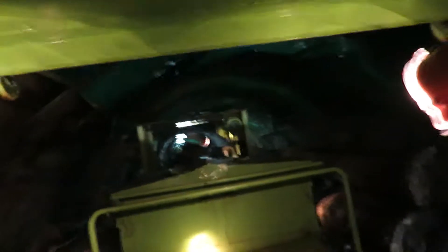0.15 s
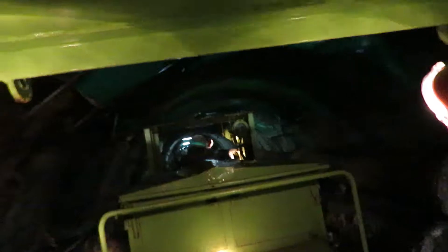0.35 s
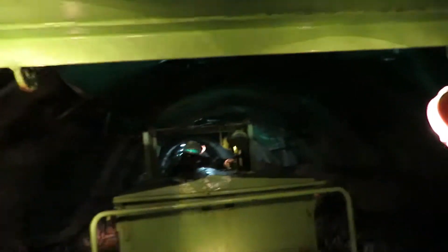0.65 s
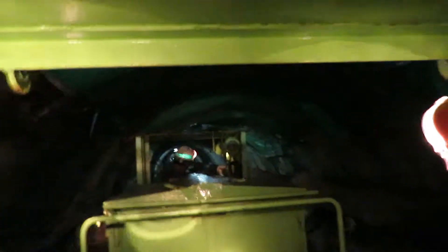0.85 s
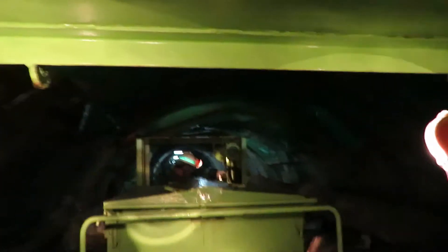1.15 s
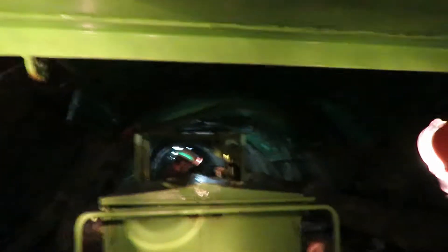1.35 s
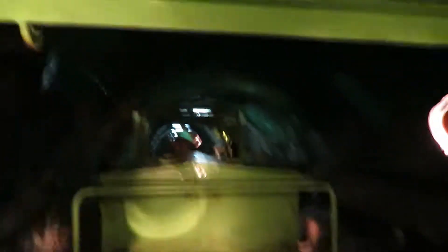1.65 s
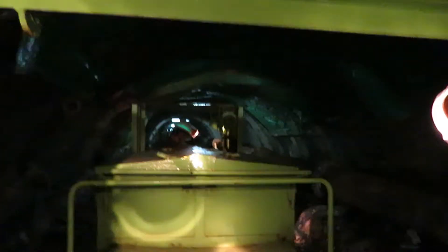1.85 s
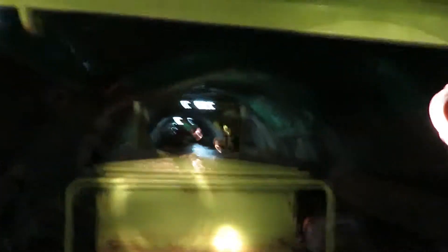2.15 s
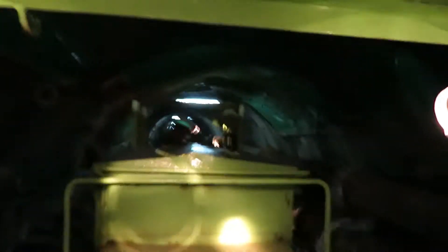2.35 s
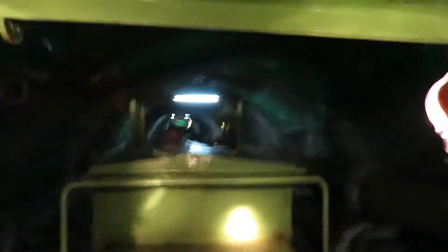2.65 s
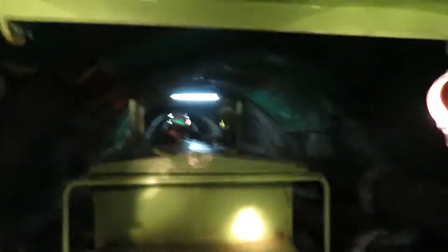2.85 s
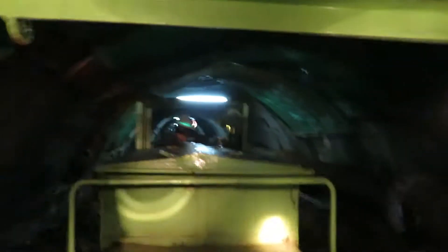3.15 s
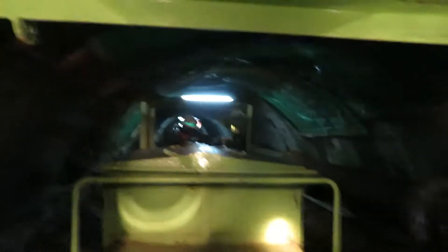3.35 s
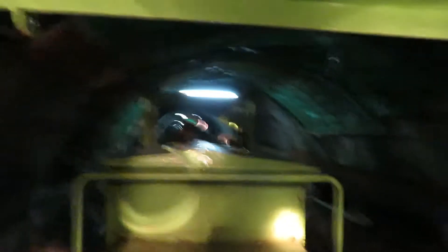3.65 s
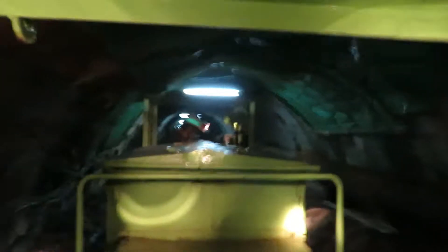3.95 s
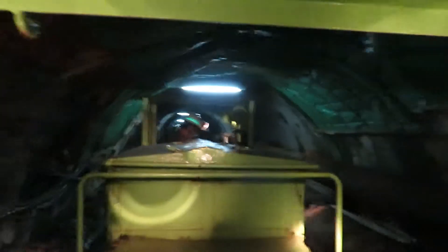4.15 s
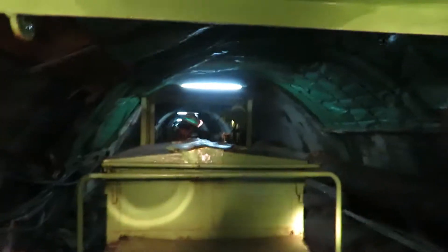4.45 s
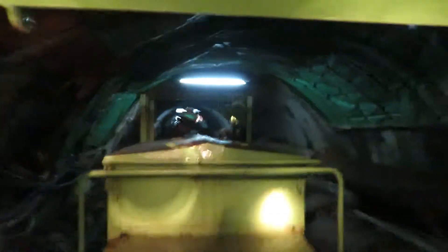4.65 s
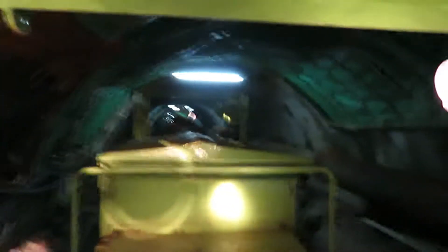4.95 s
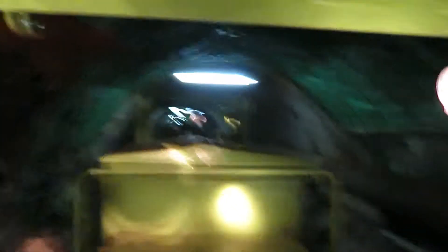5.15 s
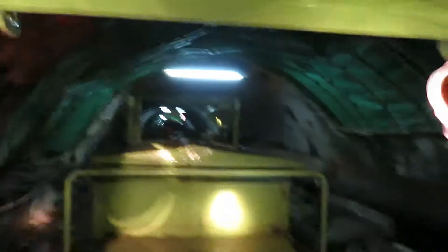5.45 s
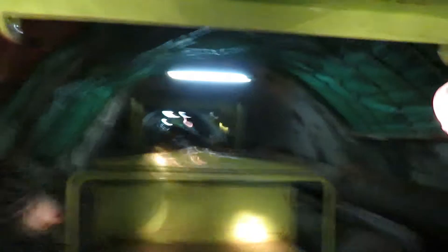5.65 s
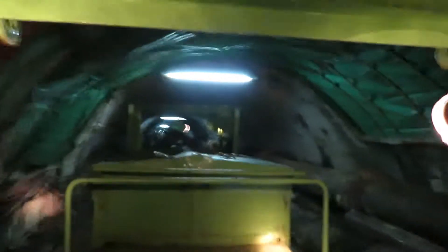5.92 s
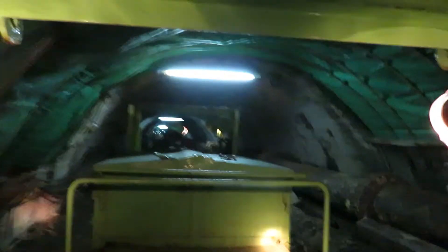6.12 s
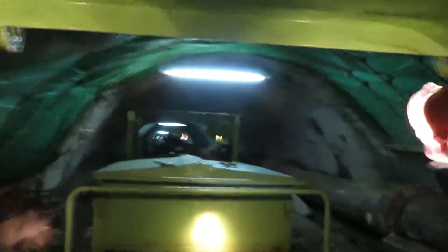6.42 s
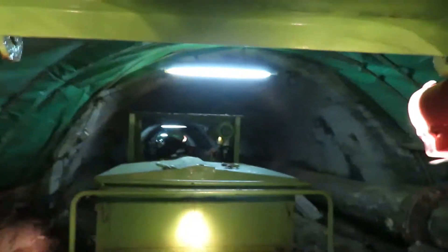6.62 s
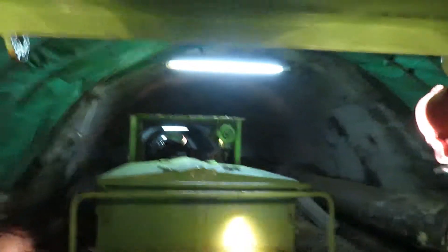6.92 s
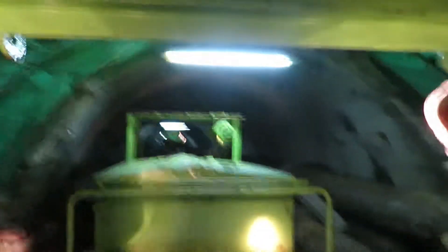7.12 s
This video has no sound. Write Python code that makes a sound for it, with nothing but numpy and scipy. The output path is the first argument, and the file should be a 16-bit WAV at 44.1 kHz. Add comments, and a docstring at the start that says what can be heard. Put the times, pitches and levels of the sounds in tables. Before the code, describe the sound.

A small electric mine train rolls through a tunnel, steel cars booming and roaring while loose bars, doors and couplings clack and clank irregularly.

```python
"""Mine train in a rock tunnel

A small electric train rolls along, heard from an open car behind the locomotive.
Steel car bodies boom and roar (resonant noise), the drive hums (wavering sines), loose fittings chatter.
Couplings, bars and doors clack as the cars jolt (decaying modes and noise); the tunnel answers briefly."""
import sys
import numpy as np
from scipy import signal
from scipy.fft import rfft, irfft, next_fast_len
from scipy.io import wavfile
from scipy.ndimage import uniform_filter1d, map_coordinates

SR = 44100
rng = np.random.default_rng(int(sys.argv[2]) if len(sys.argv) > 2 else 0)


def file_out(sig):
    """Save sig as 16-bit WAV at sys.argv[1]."""
    # one column per channel
    cols = np.atleast_2d(sig).T
    # limit, then scale
    lim = np.clip(cols, -1, 1)
    pcm = np.round(lim * 32767).astype(np.int16)
    wavfile.write(sys.argv[1], SR, pcm)


N = 321048  # samples, 7.28 s

# tunnel tail decay: freq_hz, t60_s
TUNNEL_DECAY = [(300, 0.62), (2500, 0.15), (6000, 0.15), (12000, 0.073)]
# stereo width: freq_hz, side_gain_db
SIDE_WIDTH = [(30, -40), (85, -39.5), (170, -25), (350, -21), (700, -20), (1400, -14.5), (2800, -10),
              (5600, -4.5), (11000, 4)]
# stereo tilt: freq_hz, left_minus_right_db
LEFT_LEAN = [(200, 0), (600, 0.1), (1000, 1.5), (2000, 0.3)]
TOP_HZ = 14500

# motor hum swells: middle_s, length_s, level_db
HUM_SWELLS = [(0.348, 0.8, -19.5), (1.5, 0.15, -23.5), (2.558, 0.23, -23.5), (2.995, 0.57, -29),
              (4.33, 0.26, -19), (6.533, 0.25, -21), (7.11, 0.065, -14)]
HUM_HZ, HUM_DB, HUM_SWING_DB = 170.6, -31, 1.5  # level between the swells
WHINE_HZ, WHINE_DB, WHINE_SWING_DB = 1820, -31.5, 4.5  # gears; level relative to the rolling

# car body notes: middle_s, length_s, pitch_hz, level_db
DRONES = [(1.026, 0.12, 283, -20.5), (1.305, 0.11, 82.46, -17.5), (1.583, 0.095, 69.1, -18),
          (2.268, 0.13, 256, -17.5), (4.56, .14, 139, -21), (5.302, .2, 137.4, -19),
          (4.956, 1, 139.2, -23.5), (5.001, .3, 86, -19), (5.15, 0.35, 285.4, -28),
          (5.997, 0.22, 285.2, -26.5), (6.305, 0.28, 140.8, -25), (6.88, 0.09, 67.6, -19.5),
          (7.098, 0.29, 138.6, -22), (7.214, 0.11, 284, -22)]
DRONE_WAVER_HZ, DRONE_SWING_DB = 2.45, 2

# small loose parts; level relative to the grinding, before the contact spectrum
TICK_HZ, TICK_LOG_SPREAD, TICK_T60_S = 2604, 0.45, 0.045
TICK_DB, TICK_SCATTER_DB = -15.5, 6.5

# sliding bolt partials: freq_hz, level_db, t60_s
BOLT_MODES = [(2600, -9, .15), (3025, -10, .17), (3408, -6, .11), (4140, -2, .078), (4764, -10, .12),
              (6218, 0, .08), (7135, -7, .1), (7450, -9, .06), (8732, -13, .09), (12400, -17, .045)]
# safety bar partials: freq_hz, level_db, t60_s
BAR_MODES = [(1276, -1, .15), (1750, 1, .06), (2358, -9, .25), (3456, -3, .1), (3660, -4, .06),
             (3811, -2, .14), (4600, -8, .08), (5098, -8, .06), (5803, -12, .12), (8100, -16, .08)]
# jolts ringing both: start_s, bolt_db, bar_db
BOLT_BAR_RINGS = [(0.538, -23.5, -32), (2.618, -32, -35), (2.837, -37, -38), (3.26, -37, -34),
                  (5.280, -31, -23), (5.316, -33, -34), (5.364, -36, -42), (6.123, -42, -23)]

# thuds of car walls and of wheels dropping over rail joints (98-140 Hz): start_s, level_db, centre_hz
THUDS = [(0.18, -28, 456), (0.44, -16, 237), (0.538, -22, 627), (0.544, -15, 248), (0.92, -22.5, 439),
         (0.969, -17.5, 128.5), (2.05, -13.5, 118.6), (2.618, -22.5, 710), (2.66, -22.5, 378),
         (2.832, -21, 650), (2.88, -26, 733), (3.075, -15, 140), (3.565, -39, 650), (4.14, -22.5, 470),
         (4.91, -23.5, 480), (4.999, -20, 98), (5.275, -19, 487), (5.32, -26.5, 542), (5.876, -31, 520),
         (6.122, -26, 575), (7.05, -14.5, 100.5)]
THUD_EDGE_RATIO, THUD_RISE_S, THUD_T60_S = 0.94, 0.0014, 0.12  # upper band edge over centre

# knocks of bars and doors: hit_s, level_db, dull_clank_db, bright_edge_db (both relative), note_hz
CLACKS = [(0.03, -24, -5.5, -31.5, 1890), (0.07, -33, -5, -15, 2200), (0.115, -31, -12, -19.5, 2380),
          (0.188, -28, -5.5, -27, 2190), (0.305, -28, -3, -32.5, 1760), (0.418, -19, -9.5, -29, 2230),
          (0.54, -17, -7.5, -13.5, 1081), (0.76, -25.5, 8, -20.5, 1020), (0.8707, -28.5, 8, -19, 1230),
          (0.9385, -20.5, -11, -40, 2100), (0.98, -37, 16.5, -32, 1910), (1.072, -35.5, 16, -28.5, 1274),
          (1.1628, -29.5, 7, -36.5, 1223), (1.268, -28, -7, -27.5, 1780), (1.3573, -22, -13, -41, 900),
          (1.4032, -28, 2, -31.5, 1215), (1.6282, -29.5, 13, -28.5, 1760), (1.7789, -29, 7, -39, 1920),
          (1.933, -27.5, -3, -27, 1500), (2.015, -32, -8, -23.5, 2500), (2.066, -35, 7, -16.5, 1010),
          (2.0847, -32, 5, -23.5, 1005), (2.147, -28.5, 7, -25.5, 1010), (2.247, -30.5, 12, -21.5, 1034),
          (2.2797, -32.5, 16, -27.5, 1146), (2.355, -25, -1, -31, 2740), (2.4249, -33.5, 5, -27, 1670),
          (2.505, -29, 9, -16, 1026), (2.5907, -22, 10, -16.5, 1050), (2.559, -28.5, 1, -27, 2020),
          (2.6135, -15.5, -4, -17.5, 1310), (2.633, -23, 6, -26, 2210), (2.6638, -29.5, 16, -25.5, 1242),
          (2.7197, -29.5, 13, -30, 1090), (2.7871, -30.5, 13, -21.5, 1030), (2.8117, -19.5, 8.5, -15, 1031),
          (2.8364, -21.5, 3.5, -12.5, 1050), (2.856, -29, -4, -21, 1530), (2.889, -30, -1, -24.5, 2110),
          (3.016, -23.5, -10, -22, 1620), (3.03, -26.5, -6, -24, 1626), (3.0494, -23.5, 12, -18.5, 1034),
          (3.1797, -33.5, 17.5, -35, 1094), (3.256, -21, 1.5, -17.5, 1220), (3.3362, -23, 1, -33, 1046),
          (3.399, -29, -6, -26.5, 2360), (3.5535, -26, 10, -24, 1140), (3.589, -28, -7, -28.5, 2020),
          (3.6602, -20.5, -13, -32.5, 1700), (3.742, -28, 0, -32, 2775), (3.897, -31.5, -1, -26.5, 2350),
          (4.0417, -28.5, 7, -29.5, 1164), (4.061, -28.5, 1, -29, 2290), (4.13, -23, -8, -30, 1800),
          (4.2284, -22, -10, -31, 2040), (4.322, -27.5, -1, -36, 3300), (4.4223, -32.5, 15, -28.5, 1357),
          (4.5035, -22.5, -7, -36, 3210), (4.6109, -25.5, -1.5, -36, 1240), (4.655, -26, -3, -29, 3300),
          (4.7336, -26, 4, -23, 986), (4.7855, -20.5, -8.5, -31, 2075), (4.8332, -21.5, -14, -31.5, 3380),
          (4.9312, -27.5, 4.5, -28.5, 1033), (5.003, -24, -4, -40.5, 3010),
          (5.2593, -21.5, 13, -12.5, 1040), (5.281, -17, -1, -11.5, 1295), (5.295, -21.5, 14, -17, 1043),
          (5.3153, -18, -12, -12, 1610), (5.326, -19.5, -6, -19.5, 2290), (5.339, -22.5, 4.5, -23.5, 2270),
          (5.3629, -21, -1.5, -15.5, 1590), (5.384, -26, 5.5, -23.5, 1970), (5.645, -33.5, -8, -25, 2130),
          (5.806, -35, 10, -31.5, 1420), (5.9531, -26, -2.5, -31.5, 1020), (6.0701, -28, 8, -22.5, 960),
          (6.1216, -17, -5, -17, 1630), (6.21, -29, -11, -21.5, 1550), (6.2936, -22, -4.5, -34, 1805),
          (6.4403, -30, 13.5, -33.5, 1800), (6.4737, -26, 5.5, -20.5, 1063), (6.522, -21.5, 0, -29.5, 1000),
          (6.5984, -22.5, -0.5, -23, 1287), (6.6351, -22, 1.5, -17, 1040),
          (6.786, -28.5, 10.5, -16.5, 1095), (6.835, -27, 4, -18.5, 1010), (7.0823, -38, 20.5, -35, 1020),
          (7.1656, -26.5, 7, -33.5, 1090)]
# steel fitting modes: freq_hz, level_db, t60_s
STEEL_MODES = [(991, -5.5, 0.39), (1070, -3, 0.17), (1278, -5.5, 0.28), (1600, -25.5, 0.26),
               (1587, -6, 0.082), (1970, -14.5, 0.14), (2250, -13.5, 0.28), (2870, -19, 0.17),
               (2680, -17.5, 0.074), (3850, -11, 0.066), (4680, -10, 0.18), (4990, -4.5, 0.19),
               (5700, -4, 0.14), (6140, -8, 0.11), (6720, -7, 0.12), (7100, -3.5, 0.13), (8080, -8, 0.1),
               (8700, -2, 0.13), (10600, -1, 0.1), (12600, 1, .08)]
# spectrum of a steel contact: freq_hz, gain_db
CONTACT_SPECTRUM = [(300, -9), (550, 2.5), (750, 1), (1050, 10.5), (2000, 8), (2800, 4.5), (3800, -1),
                    (5400, -10), (6300, -12), (7200, -14), (7800, -17), (8700, -18), (10500, -21),
                    (13000, -23.5), (15000, -32.5)]
# decay of contact noise: freq_hz, t60_s
CONTACT_DECAY = [(500, 0.39), (2000, 0.19), (5000, 0.14), (12000, 0.11)]
GRIT_DB, GRIT_KNOTS_PER_S = 1.5, 220  # a struck part judders against its seat: ragged knocks

# couplings taking up slack: hit_s, level_db, link_ring_db, pin_ring_db
CLANKS = [(0.7597, -11.5, -31, -32), (1.6821, -13.5, -41, -48), (1.8603, -14, -46, -39.5),
          (2.146, -12, -29.5, -44), (2.623, -20, -46, -34.5), (2.842, -16, -44, -37),
          (3.5529, -21, -44, -47), (4.873, -15.5, -35, -44), (5.3296, -15, -38, -28),
          (6.1449, -14.5, -42, -50), (6.8347, -7.5, -24, -31.5)]
# coupling modes: freq_hz, level_db, t60_s
COUPLING_MODES = [(792, 6, 0.2), (1034, 6.5, 0.12), (1230, -7, 0.12), (1479, -4, 0.11), (1900, -6.5, 0.14),
                  (2320, -11.5, 0.24), (2840, -6, 0.12), (3060, -5.5, 0.2), (4000, -12, 0.11),
                  (4650, -4.5, 0.18)]
# long notes of link, then pin: freq_hz, t60_s
LINK_AND_PIN = [(1560, 0.4), (2705, 0.42)]
RING_ROUGHNESS, RING_KNOTS_PER_S = 0.39, 45.6  # loose parts chatter against each other as they ring

# flange pressure on the rail: time_s, relative_grind_db
FLANGES = [(0, -35.5), (.26, -39), (.51, -33), (.72, -37), (.97, -35.5), (1.13, -41.5), (1.42, -37),
           (1.59, -39), (1.8, -34.5), (2.07, -34.5), (2.3, -32.5), (2.7, -32.5), (3.08, -33), (3.5, -38),
           (3.65, -32.5), (3.95, -41.5), (4.11, -38), (4.46, -39), (4.9, -31), (5.2, -34.5), (5.4, -38.5),
           (5.6, -39.5), (5.72, -45.5), (5.85, -39), (6.12, -33.5), (6.4, -38.5), (6.55, -30),
           (6.75, -38.5), (7, -35), (7.28, -31.5)]
# spectrum of grinding: freq_hz, gain_db
RAIL_SPECTRUM = [(600, -0.5), (800, 8.5), (1030, 4), (1350, 0), (1850, 0), (2500, -10), (3400, -12.5),
                 (4500, -21.5), (6000, -27), (7100, -33.5), (7800, -34.5), (10000, -41), (14000, -42.5)]
GRIND_REF_DB, SCRAPE_REF_DB, SCRAPE_DB_PER_DB = -34.5, -46, 0.62  # scraping at the reference; its growth
# rough spots on the rail: middle_s, length_s, roar_change_db, grind_change_db, scrape_change_db
ROUGH_SPOTS = [(0.101, 0.12, -5.5, -3.5, 5.5), (1.441, 0.16, 2.5, 6.5, 3.5), (2.274, 0.076, 5.5, 2.5, 8),
               (3.088, 0.054, 3, -5, 2.5), (4.104, 0.26, 3.5, 6.5, 3.5)]

# rolling on uneven track: time_s, relative_roar_db
ROLLING = [(0, -19.5), (.5, -22), (1.7, -20), (1.9, -22.5), (2.65, -20.5), (3.4, -23), (4.45, -23.5),
           (4.85, -19.5), (5.35, -20.5), (5.47, -26), (5.75, -27.5), (5.9, -22), (6.3, -24.5),
           (6.55, -19.5), (6.95, -23), (7.28, -19)]
# car body boom: time_s, relative_level_db
BOOM = [(0, -17), (.4, -20), (.8, -17.5), (1.05, -17), (1.4, -18.5), (1.75, -17), (1.98, -19.5),
        (2.15, -22.5), (2.45, -22), (2.85, -17.5), (3.15, -20), (3.26, -22), (3.4, -18), (3.6, -19),
        (3.95, -18.5), (4.28, -19), (4.47, -23), (4.58, -17), (5.15, -20.5), (5.33, -18), (5.48, -24),
        (5.78, -23.5), (5.9, -20.5), (6.1, -23), (6.55, -18.5), (6.95, -20), (7.1, -18.5), (7.28, -22)]
# chassis swells: time_s, level_db
SHUDDER = [(0, -26.5), (.6, -26), (1.15, -28.5), (1.45, -32.5), (1.7, -26), (2.08, -21), (2.35, -28.5),
           (3.05, -24), (3.45, -34), (3.75, -19), (4.35, -37), (4.95, -24.5), (5.6, -40), (5.9, -24),
           (6.5, -29), (7.28, -30)]
# floor boom as the car rocks: time_s, relative_level_db
FLOOR_BOOM = [(0, -19.5), (.35, -18.5), (.45, -23), (.6, -15.5), (.75, -30), (.92, -23), (1.03, -15.5),
              (1.15, -15.5), (1.3, -16.5), (1.43, -18), (1.58, -14), (1.7, -18.5), (1.9, -20), (2.05, -15),
              (2.25, -15.5), (2.45, -22.5), (2.68, -14.5), (2.82, -27), (3.12, -16), (3.27, -21.5),
              (3.43, -16), (3.68, -15.5), (3.85, -21.5), (4.12, -13.5), (4.42, -21.5), (4.7, -19),
              (5.03, -16.5), (5.3, -19), (5.5, -22.5), (5.8, -21.5), (6, -16), (6.2, -19.5), (6.35, -20.5),
              (6.48, -16), (6.7, -20), (6.88, -15.5), (6.98, -20), (7.06, -18), (7.28, -14.5)]
# chassis resonances: freq_hz, width_hz, level_db
CHASSIS_MODES = [(38.7, 3.8, 3.5), (49, 6.4, -2.5)]
# floor resonances: freq_hz, width_hz, level_db
FLOOR_MODES = [(67.8, 11, 2.3), (89.1, 14, 3.4)]
# body resonances: freq_hz, width_hz, level_db
BODY_MODES = [(117.3, 23, -2), (140.6, 29, -1), (171.8, 38, -3.5)]
# panel resonances: freq_hz, width_hz, level_db
PANEL_MODES = [(218, 93, -6.5), (254.3, 40, 0), (282.7, 33, 1.5), (349.7, 73, -3), (415.4, 67, -3.5),
               (491.7, 58, -1.5), (574, 121, -7.5), (745.6, 14, -9)]
# broad roar between the panel resonances: freq_hz, gain_db
ROLL_SPECTRUM = [(88, -30), (150, 4.5), (211, 0), (269, -4), (317, -8), (494, -26.5), (700, -16),
                 (1030, -24.5), (1200, -13.5), (1560, -54), (2640, -120)]
BOOM_SWING_DB, LUMP_DB, LUMP_KNOTS_PER_S = 1.26, 0.24, 11  # random surges of boom and of roar
TAP_SHARE = 0.26  # share of roar and grinding power that follows the taps


def amp(db):
    """Amplitude of a dB value."""
    return 10 ** (np.asarray(db) / 20)


def unit(x):
    """Scale to rms 1."""
    return x / np.sqrt(np.mean(x ** 2) + 1e-20)


def unit_attack(x):
    """Scale mid and side so that the first 20 ms of the mid have rms 1."""
    return x / np.sqrt(np.mean(x[..., :1, :SR // 50] ** 2, axis=-1, keepdims=True))


def along(points, hz):
    """Interpolate (freq_hz, value) points on a log frequency axis."""
    f, v = np.transpose(points)
    return np.interp(np.log(hz + 1), np.log(f + 1), v)


def curve(rows):
    """Interpolate (time_s, value) points to one value per sample."""
    s, values = np.transpose(rows)
    return np.interp(np.arange(N) / SR, s, values)


def wobble(knots_per_s, size=N):
    """Smooth random curve through normal-distributed knots."""
    knots = rng.standard_normal(int(size * knots_per_s / SR) + 4)
    return map_coordinates(knots, [np.arange(size) * knots_per_s / SR])


def sine(hz):
    """Sine following a frequency curve."""
    return np.sin(2 * np.pi * np.cumsum(hz) / SR)


def swell(middle_s, length_s):
    """Rounded hump of height 1."""
    return np.exp(-(2 * (np.arange(N) / SR - middle_s) / length_s) ** 4)


def filtered(x, response):
    """Multiply the spectrum by a response of frequency."""
    n = x.shape[-1]
    m = next_fast_len(n + 4096)
    return irfft(rfft(x, m) * response(np.fft.rfftfreq(m, 1 / SR)), m)[..., :n]


def band(hz, lo_hz, hi_hz, order=4):
    """Gain of a band-pass."""
    return 1 / np.sqrt((1 + (lo_hz / (hz + 1)) ** (2 * order)) * (1 + (hz / hi_hz) ** (2 * order)))


def resonances(modes, hz):
    """Power sum of steep resonances, each the square of a simple one."""
    power = sum(amp(2 * db) * np.abs(hz * w / (c * c - hz * hz + 1j * hz * w)) ** 4 for c, w, db in modes)
    return np.sqrt(power)


def rush(response, even_s):
    """Mid and side noise, levelled to rms 1 over spans of even_s."""
    x = filtered(rng.standard_normal((2, N)), response)
    power = np.abs(uniform_filter1d(x ** 2, max(int(even_s * SR), 64), axis=1))
    return x / np.sqrt(power + 1e-20)


def patchy(x, depth_db):
    """Random swells, each a few hundred Hz wide and some tens of ms long."""
    z = signal.stft(x, nperseg=512)[2]
    field = uniform_filter1d(rng.standard_normal(z.shape[1:]), size=4, axis=0)
    field = uniform_filter1d(field, size=8, axis=1)
    return unit(signal.istft(z * amp(depth_db * unit(field)), nperseg=512)[1][:, :N])


def dying(t60s, size):
    """Mid and side noise in which each frequency decays at its own rate."""
    hz, t, z = signal.stft(rng.standard_normal((2, size)), SR, nperseg=128)
    decay = amp(-60 * t / along(t60s, hz)[:, None])
    return signal.istft(z * decay, SR, nperseg=128)[1][:, :size]


def add(track, s, sound):
    """Mix a sound in at time s."""
    start = max(round(s * SR), 0)
    track[:, start:start + sound.shape[1]] += sound[:, :N - start]


def mode_sum(strength, hz, t60, t):
    """Decaying sines from complex mid and side strengths."""
    return np.imag(strength @ np.exp(np.outer(2j * np.pi * hz - np.log(1000) / t60, t)))


def struck(modes, t):
    """Partials ringing in random phase after a short contact."""
    hz, db, t60 = np.transpose(modes)
    strength = amp(db) * np.exp(2j * np.pi * rng.random((2, len(hz))))
    return mode_sum(strength, hz, t60, t) * (1 - np.exp(-t / 0.0011))


def steel_blow(modes, ring_db, rise_s, size=SR // 3):
    """Contact of two parts: decaying noise plus the ringing modes of the struck part."""
    t = np.arange(size) / SR
    hz, db, t60 = np.transpose(modes)
    force, detune = rng.standard_normal((2, len(hz)))
    phase = 2 * np.pi * rng.random((2, len(hz)))
    strength = amp(db + ring_db + 2.9 * force) * np.exp(1j * phase)
    ring = mode_sum(strength, hz * (1 + 0.005 * detune), t60, t)
    # each point of contact favours other regions of the spectrum
    regions = np.transpose([np.geomspace(700, 15000, num=30), 2.5 * rng.standard_normal(size=30)])
    blow = filtered(dying(CONTACT_DECAY, size) + ring,
                    lambda f: amp(along(CONTACT_SPECTRUM, f) + along(regions, f)))
    return blow * (1 - np.exp(-(t / rise_s) ** 2))


def chatter(taps_per_s, t60_s, scatter_db):
    """Strength, rms 1, of random light taps of loose parts: each rises fast and dies away."""
    taps = (rng.random(N) < taps_per_s / SR) * amp(scatter_db * rng.random(N)) ** 2
    t = np.arange(SR // 5) / SR
    envelope = amp(-60 * t / t60_s) * (1 - np.exp(-t / 0.0067))
    energy = signal.oaconvolve(taps, envelope ** 2)[:N]
    return unit(np.sqrt(np.abs(energy)))


def jogged(taps):
    """Gain of a sound that owes TAP_SHARE of its power to the taps."""
    return np.sqrt(1 - TAP_SHARE + TAP_SHARE * taps ** 2)


def rough_spots():
    """Rough rail shifts the levels of roar, grinding and scraping: three dB curves."""
    return sum(np.outer(changes_db, swell(s, length)) for s, length, *changes_db in ROUGH_SPOTS)


def tunnel(x):
    """Rock walls return a short, dull tail: mid convolved with decaying noise after 12.5 ms."""
    tail = dying(TUNNEL_DECAY, size=SR // 2)
    delayed = np.pad(x[:1], ((0, 0), (SR // 80, 0)))
    return signal.fftconvolve(delayed, tail / np.linalg.norm(tail[0]), axes=1)[:, :N]


def drive():
    """Motor hum and faint gear whine, both wavering sines; the whine follows the rolling load."""
    hum_gain = amp(HUM_DB) + sum(amp(db) * swell(s, length) for s, length, db in HUM_SWELLS)
    hum = hum_gain * amp(HUM_SWING_DB * wobble(20)) * sine(HUM_HZ + 3 * wobble(9.9))
    whine_db = curve(ROLLING) + WHINE_DB + WHINE_SWING_DB * wobble(11)
    whine = amp(whine_db) * sine(WHINE_HZ + 5 * wobble(15))
    return np.array([hum + whine, whine])


def drones():
    """Single car body resonances build up to wavering notes and fade."""
    notes = sum(amp(db) * swell(s, length) * sine(hz + DRONE_WAVER_HZ * wobble(12))
                for s, length, hz, db in DRONES)
    return notes * amp(DRONE_SWING_DB * np.array([wobble(11)] * 2))


def rattle(count):
    """Chain links and screws tick at random on short partials, harder when the flanges bite."""
    track = np.zeros((2, N))
    t = np.arange(SR // 20) / SR
    grind_db = curve(FLANGES)
    for when, force in rng.random((count, 2)):
        notes_hz = TICK_HZ * np.exp(TICK_LOG_SPREAD * rng.standard_normal(size=6))
        notes_hz = np.clip(notes_hz, 500, SR / 4)
        db = grind_db[int(when * N)] + TICK_DB + TICK_SCATTER_DB * force ** 2
        modes = [(hz, db + along(CONTACT_SPECTRUM, hz), TICK_T60_S) for hz in notes_hz]
        add(track, when * N / SR, struck(modes, t))
    return track


def bolt_and_bar():
    """Hard jolts set a sliding bolt and a safety bar ringing on their own partials."""
    track = np.zeros((2, N))
    t = np.arange(SR // 4) / SR
    for s, bolt_db, bar_db in BOLT_BAR_RINGS:
        add(track, s, amp(bolt_db) * struck(BOLT_MODES, t) + amp(bar_db) * struck(BAR_MODES, t))
    return track


def thuds():
    """Heavy jolts and rail joints thud: narrow noise bursts with exponential decay."""
    track = np.zeros((2, N))
    t = np.arange(SR // 3) / SR
    envelope = amp(-60 * t / THUD_T60_S) * (1 - np.exp(-t / THUD_RISE_S))
    for s, db, hz in THUDS:
        burst = filtered(rng.standard_normal((2, len(t))),
                         lambda f: band(f, hz / THUD_EDGE_RATIO, hz * THUD_EDGE_RATIO, order=3))
        add(track, s, amp(db) * unit_attack(burst * envelope))
    return track


def clacks():
    """Jolts knock bars and doors: steel blows weighted in dull, middle and bright bands."""
    track = np.zeros((2, N))

    def zones(f):
        dull, middle = band(f, 300, 2000), band(f, 2260, 5230)
        return np.array([dull, middle, band(f, 4380, 15000, order=8)])[:, None]

    for s, db, clank_db, edge_db, note_hz in CLACKS:
        lightness_db = max(-11 - db, 0)  # light touches graze: softer start, less energy
        note = (note_hz, 10.5 + 0.41 * clank_db, 0.08)  # the duller the clank, the clearer its note
        blow = steel_blow(STEEL_MODES + [note], ring_db=-14.5, rise_s=0.0022 + 0.00024 * lightness_db)
        grit = amp(GRIT_DB * wobble(GRIT_KNOTS_PER_S, size=blow.shape[1]))
        parts = unit_attack(filtered((grit * blow)[None], zones))
        gains = amp(db - 0.29 * lightness_db + np.array([clank_db - 9.5, -9.5, edge_db]))
        add(track, s - 0.0035, np.tensordot(gains, parts, axes=1))  # early, to allow for the rise
    return track


def long_ring(hz, t60_s, level_db, t):
    """Decaying note of a coupling part, its strength and phase fluttering at random."""
    in_phase, quadrature = (wobble(RING_KNOTS_PER_S, size=len(t)) for _ in range(2))
    flutter = 1 + RING_ROUGHNESS * (in_phase + 1j * quadrature)
    phase = np.angle(flutter) + 2 * np.pi * (hz * t + rng.random((2, 1)))
    ring = unit(abs(flutter)) * np.sin(phase)
    return ring * amp(level_db - 60 * t / t60_s) * (1 - np.exp(-t / 0.0024))


def couplings():
    """A heavy link snaps taut and bounces once; link and pin ring on."""
    track = np.zeros((2, N))
    t = np.arange(SR // 2) / SR
    for s, db, *rings_db in CLANKS:
        for delay_s, gain_db in [(0, -12.5), (0.019, -24)]:
            blow = steel_blow(COUPLING_MODES, ring_db=-11, rise_s=0.0016)
            blow = filtered(blow, lambda f: band(f, 750, 5200))  # the heavy contact has no bright edge
            add(track, s + delay_s - 0.002, amp(db + gain_db) * unit_attack(blow))
        for (hz, t60_s), ring_db in zip(LINK_AND_PIN, rings_db):
            add(track, s, long_ring(hz, t60_s, ring_db, t))
    return track


def grind(taps):
    """Wheels grind and scrape on the rail: patchy noise coloured by steel, jogged by the taps."""
    grind_db = curve(FLANGES)
    scrape_db = SCRAPE_REF_DB + SCRAPE_DB_PER_DB * (grind_db - GRIND_REF_DB)
    _, grind_change_db, scrape_change_db = rough_spots()
    steel = [(hz, 45, db - 1) for hz, db, _ in STEEL_MODES]  # 45 Hz wide

    def rail(f):
        return amp(along(RAIL_SPECTRUM, f)) * (4.5 + resonances(steel, f))

    low = patchy(rush(lambda f: rail(f) * band(f, 745, 2500), even_s=0.07), depth_db=2.5)
    high = patchy(rush(lambda f: rail(f) * band(f, 2590, 12000), even_s=0.15), depth_db=3.5)
    grinding = amp(grind_db + grind_change_db + 0.5) * low
    scraping = amp(scrape_db + scrape_change_db) * high
    return jogged(taps) * (grinding + scraping)


def rumble(taps):
    """Rough rails shake chassis, floor, bodies and panels: resonant noise; taps jog the panels."""
    shudder = rush(lambda f: resonances(CHASSIS_MODES, f) + amp(-30.5) * band(f, 18, 50), even_s=0.19)
    floor = rush(lambda f: resonances(FLOOR_MODES, f) * band(f, 45, 130, order=6), even_s=0.09)
    boom = rush(lambda f: resonances(BODY_MODES, f) * band(f, 90, 211, order=6), even_s=0.089)

    def panels(f):
        broad = amp(along(ROLL_SPECTRUM, f) - 5.5)
        return (resonances(PANEL_MODES, f) + broad) * band(f, 190, 880, order=3)

    roar = patchy(rush(panels, even_s=0.077), depth_db=0.65) * jogged(taps)
    boom_db = curve(BOOM) - 0.82 + BOOM_SWING_DB * wobble(LUMP_KNOTS_PER_S)
    roar_db = curve(ROLLING) + 0.14 + rough_spots()[0] + LUMP_DB * wobble(LUMP_KNOTS_PER_S)
    low = amp(curve(SHUDDER)) * shudder + amp(curve(FLOOR_BOOM) - 2.5) * floor
    return low + amp(boom_db) * boom + amp(roar_db) * roar


def scene():
    """Mix to left and right: bass nearly alike in both ears, treble wide."""
    taps = chatter(taps_per_s=50, t60_s=0.23, scatter_db=34)
    rolling = drive() + drones() + grind(taps) + rumble(taps)
    knocks = rattle(count=340) + bolt_and_bar() + thuds() + clacks() + couplings()
    mid, side = rolling + knocks + amp(-12.5) * tunnel(knocks)
    side = filtered(side, lambda f: amp(along(SIDE_WIDTH, f)))
    stereo = np.array([mid + side, mid - side])
    return filtered(stereo, lambda f: amp(np.outer([0.5, -0.5], along(LEFT_LEAN, f))))


def record(dry):
    """Band limit: nothing passes from TOP_HZ up."""
    return filtered(dry, lambda hz: hz < TOP_HZ)


dry = scene()
out = record(dry)
file_out(out)
```